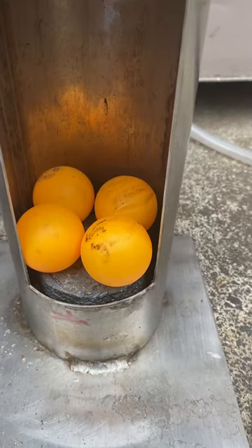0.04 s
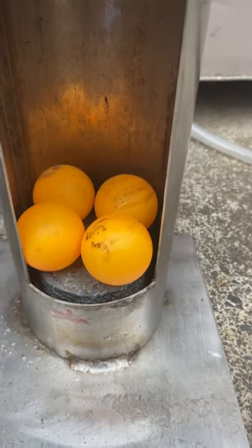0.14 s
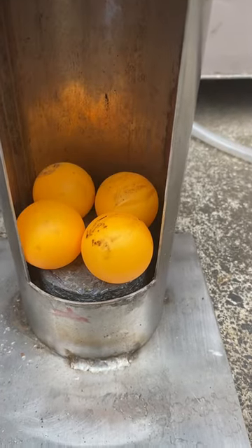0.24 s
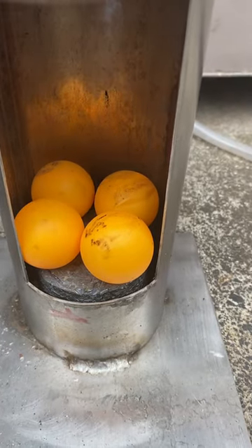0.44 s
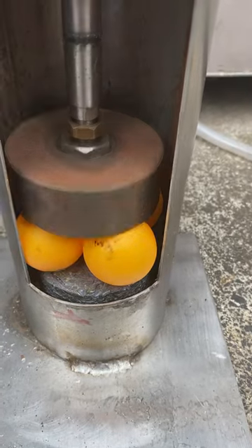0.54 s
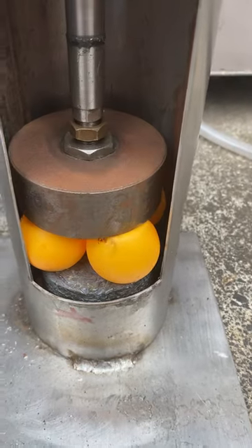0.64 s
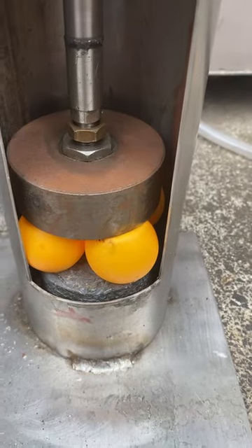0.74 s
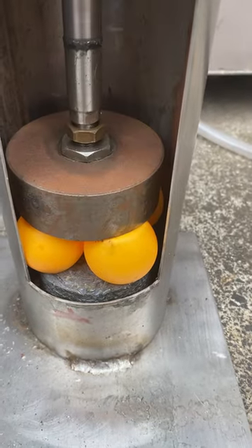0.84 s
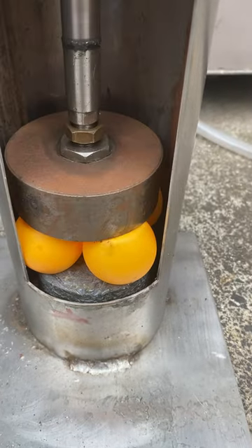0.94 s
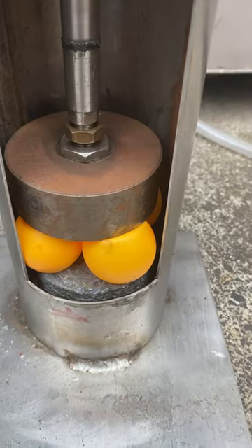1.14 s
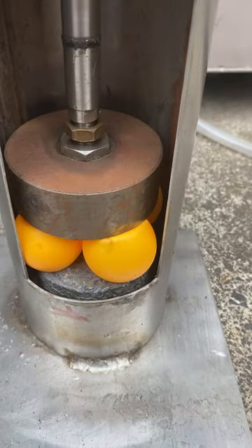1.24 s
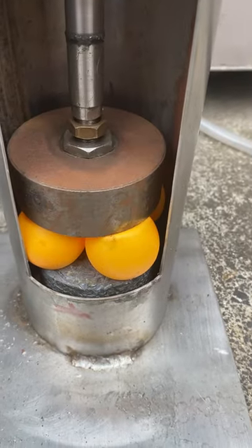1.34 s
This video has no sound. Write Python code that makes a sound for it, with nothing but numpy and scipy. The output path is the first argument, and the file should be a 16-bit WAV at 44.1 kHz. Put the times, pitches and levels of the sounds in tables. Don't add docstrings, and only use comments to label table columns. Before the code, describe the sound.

Close up outdoors, a pneumatic press clacks and blasts a short loud hiss of air, then its steel piston rattles onto hollow plastic balls with dull pocks and clinks, leaving faint traffic rumble.

```python
import sys
import numpy as np
from scipy import signal
from scipy.fft import rfft, irfft
from scipy.io import wavfile

SR = 44100
rng = np.random.default_rng(int(sys.argv[2]) if len(sys.argv) > 2 else 0)


def amp(db):
    return 10 ** (np.asarray(db, float) / 20)


def write(x):
    x = np.atleast_2d(x).T
    wavfile.write(sys.argv[1], SR, np.round(np.clip(x, -1, 1) * 32767).astype(np.int16))


N = 61739
T = np.arange(N) / SR
DUCK_S = .68


def read(table, hz):
    f, v = np.array(table, float).T
    return np.interp(np.log(np.maximum(hz, 1)), np.log(f), v)


def unit(x):
    return x / np.sqrt(np.mean(x ** 2))


def coloured(table):
    hz = np.arange(N // 2 + 1) * SR / N
    white = rng.standard_normal((2, N))
    return unit(irfft(rfft(white) * amp(read(table, hz)), N))


def band(x, hz, width):
    return signal.lfilter(*signal.iirpeak(hz, hz / width, fs=SR), x)


def walk(rate_hz):
    return unit(signal.lfilter(*signal.butter(2, rate_hz, fs=SR), rng.standard_normal(N)))


def ring(hits, modes):
    focus_db = 12.5
    rise_ms, level_scatter_db, phase_scatter_rad = 0.54, 1.5, .4
    out = np.zeros(N)
    luck = rng.standard_normal((len(hits), 2, 16))
    for (s, db, contact_ms, focus_hz), row in zip(hits, luck):
        t = np.maximum(T - s, 0)
        rise = np.minimum(t * 1000 / rise_ms, 1)
        for (hz, mode_db, t60), r, turn in zip(modes, *row):
            favour = amp(-focus_db * np.log2(hz / focus_hz) ** 2)
            soft = favour / (1 + (hz * contact_ms / 700) ** 2)
            decay = amp(db + mode_db + level_scatter_db * r - 60 * t / t60)
            out += decay * soft * np.sin(2 * np.pi * hz * t + phase_scatter_rad * turn) * rise
    return out


# frequency in Hz, level in dB per Hz.
TRAFFIC = [(25, -24.5), (45, -3.5), (75, 0.5), (105, -4), (170, -20), (500, -28.5), (1300, -39),
           (2300, -39.5), (5300, -44.5), (9000, -69)]


def yard():
    rumble_db, hiss_db, duck_db = -60, -73, 7
    hiss = amp(hiss_db + 0.5 * walk(21)) * band(rng.standard_normal((2, N)), 11000, 7200)
    far = coloured(TRAFFIC) * amp(rumble_db + 1.1 * walk(2.3)) + hiss
    return far * amp(duck_db / (1 + np.exp((T - DUCK_S) / 0.022)))


# start in seconds, level in dB, contact in ms, favoured Hz.
SETTLING = [
    (.0318, -61.5, .15, 2700),
    (.0325, -57.5, .2, 1500),
    (.9892, -53.5, .15, 1900),
    (.991, -62, 0.34, 813),
    (.9935, -57.5, .15, 2200),
    (1.3935, -70, .2, 1950),
]
# frequency in Hz, level in dB, t60 in seconds.
SHELL_MODES = [(646, -5.5, .04), (1290, -1, 0.049), (1620, 0.5, 0.022), (1900, 3, 0.035), (2120, 0, 0.04),
               (2700, -7.5, 0.038)]


def settling_taps():
    return ring(SETTLING, SHELL_MODES)


def burst(noise, s, db, hz, length, spread):
    t = T - s
    shape = (t > 0) * np.clip(t / 0.00057, 0, 1) * amp(db - 20 * np.abs(t) / length)
    return band(noise * shape, hz, spread * hz)


# start in seconds, level in dB, centre in Hz, length
# in seconds.
CREAK_EVENTS = [(.036, -45.5, 2738, 0.029), (.083, -64, 636, 0.0037), (.174, -53, 3300, 0.025),
                (.176, -53.5, 1500, .025), (.207, -42.5, 990.7, 0.084), (.2235, -35, 1870, 0.015),
                (.225, -43.5, 807, .02), (.226, -45, 4586, 0.033), (.236, -37.5, 3746, 0.018),
                (1.0, -55, 1699, 0.072), (.99, -56, 4300, .02), (.58, -29.5, 405.2, 0.16),
                (.6, -44, 227.6, 0.31), (1.13, -60.5, 4726, 0.083), (1.19, -59.5, 5200, 0.079),
                (1.17, -63.5, 3783, .15), (1.252, -60, 5255, .03)]


def creaks():
    noise, out = rng.standard_normal((2, N)), 0
    for s, db, hz, length in CREAK_EVENTS:
        rub = burst(noise, s, db, hz, length, .6)
        rub = band(rub, hz, .6 * hz)
        out = out + band(rub, hz, hz)
    return out


# start in seconds, level in dB, centre in Hz, length in seconds.
GRIT = [(.18, -58, 12000, 0.028), (0.212, -58.5, 8900, 0.0081), (0.856, -55.5, 6615, 0.02104),
        (1.051, -59, 8116, 0.018), (1.062, -55, 8500, .02), (1.127, -63.5, 9000, .03),
        (1.156, -53, 11000, 0.008), (1.213, -57, 9080, .015), (1.252, -60, 8500, 0.026),
        (1.283, -66, 10000, .015), (1.386, -62.5, 10930, .006), (1.395, -61, 5500, 0.0049)]


def ticks():
    noise = rng.standard_normal((2, N))
    return sum(burst(noise, s, db, hz, length, 1.1) for s, db, hz, length in GRIT)


# time in seconds, flow level in dB.
AIR_FLOW = [
    (0.224, -71.5),
    (0.243, -69.5),
    (0.243, -25.5),
    (0.245, -16.5),
    (0.255, -12.5),
    (0.285, -16.5),
    (.292, -18.5),
    (.52, -21),
    (0.539, -21),
    (0.56, -46),
]
# frequency in Hz, level in dB per Hz.
AIR_HISS = [(150, -26), (500, -20.5), (1600, -21.5), (2000, -4.5), (4300, -9.5), (6300, -0.5),
            (13500, -12.5), (16000, -6)]
# frequency in Hz, width in Hz, level in dB.
NOZZLE_MODES = [(546.3, 23, 3), (770.4, 90, 2.5), (1155, 69, 10.5), (1430, 120, 8), (2500, 150, -13.5),
                (3246, 140, 0.5), (5660, 160, -14.5), (10200, 1600, -2), (13000, 710, 11), (3910, 62, 2),
                (5260, 13, -4.5), (9660, 60, 1.5), (10200, 210, -2), (10860, 40, -0.5)]


def jet():
    hiss = coloured(AIR_HISS)
    tones = sum(amp(db) * band(hiss, hz, w) * amp(2 * walk(27)) for hz, w, db in NOZZLE_MODES)
    s, db = np.array(AIR_FLOW).T
    flow_db = np.interp(T, s, db, left=-120, right=-120)
    return unit(hiss + tones) * amp(flow_db + 1 * walk(146))


# start in seconds, level in dB, start pitch in Hz, end pitch in Hz, length in seconds.
JOLTS = [
    (0.2433, -23.5, 252.6, 45.1, 0.033),
    (0.266, -28, 193, 58.3, 0.023),
    (0.526, -31, 199, 78.13, 0.029),
    (0.557, -27, 242.2, 98.4, 0.02),
]


def thumps():
    out = np.zeros(N)
    for s, db, from_hz, to_hz, length in JOLTS:
        u = np.maximum(T - s, 0) / length
        hz = to_hz + (from_hz - to_hz) * np.exp(-u / 0.29)
        swell = amp(db) * np.sin(np.pi * np.minimum(u, 1))
        out -= swell * np.sin(2 * np.pi * np.cumsum(hz * (u > 0)) / SR)
    return out


# start in seconds, level in dB, contact in ms, favoured Hz.
VALVE_HITS = [
    (.2671, -12, 0.073, 3800),
    (.2669, -21, .1, 1600),
    (.2735, -26, .1, 1900),
    (.2785, -22, .08, 4000),
]
# frequency in Hz, level in dB, t60 in seconds.
VALVE_MODES = [(1045, -4.5, 0.045), (1872, 13, .025), (2810, -7.5, .015), (3560, 12, 0.0068),
               (4600, 4, 0.029)]


def valve_clacks():
    return ring(VALVE_HITS, VALVE_MODES)


# start in seconds, level in dB, contact in ms, favoured Hz.
BASE_KNOCKS = [
    (.2685, -28.5, 0.31, 455),
    (.2768, -20, 0.78, 420),
    (.5245, -25.5, 0.65, 450),
    (.5575, -22.5, 0.72, 328),
    (.565, -34.5, .6, 628),
    (.572, -21.5, 0.65, 460),
]
# frequency in Hz, level in dB, t60 in seconds.
PLATE_MODES = [(322, -4, 0.03), (460, -2, 0.04), (640, -8, 0.015), (390, -22, 0.09), (172, -19, 0.12)]


def plate_knocks():
    return ring(BASE_KNOCKS, PLATE_MODES)


# start in seconds, level in dB, contact in ms, favoured Hz.
PISTON_BLOWS = [(.5229, -6, 0.45, 1600), (.5268, -9, 0.46, 1600), (.5302, -12, 0.088, 2300),
                (.5325, -15.5, 0.26, 1500), (.5352, -5, 0.67, 1800), (.5408, -18, .3, 1700),
                (.5445, -21.5, 0.44, 1500), (.5488, -8, .4, 950), (.5496, -2.5, 0.4, 1750),
                (.5545, -10, .4, 1350), (.5585, -14.5, 0.68, 1900), (.5625, -16.5, 0.49, 1800),
                (.566, -14.5, 0.76, 1250), (.570, -23.5, .5, 1250), (.5745, -25.5, 0.75, 898.5),
                (.580, -28, .4, 2300)]
# frequency in Hz, level in dB, t60 in seconds.
BALL_MODES = [(802, -8, 0.03), (930, -5, 0.02), (1253, 0, 0.017), (1424, -5.5, 0.032), (1702, 6, 0.02),
              (1910, 1, 0.031), (2286, 1, 0.026), (2610, -15, 0.017)]


def ball_blows():
    return ring(PISTON_BLOWS, BALL_MODES)


# frequency in Hz, level in dB per Hz.
CHATTER = [(300, -37.5), (800, -19.5), (1500, -9.5), (3500, -4.5), (6000, 0.5), (10000, -3), (15000, -27)]


def rattle():
    start_s, length_s, level_db, scatter_db = .5235, .016, -15, 3.5
    t = T - start_s
    shape = (t > 0) * amp(-6 * t / length_s - 2500 * np.maximum(t - length_s, 0))
    return coloured(CHATTER) * shape * amp(level_db + scatter_db * walk(490))


# start in seconds, level in dB, contact in ms, favoured Hz.
PISTON_CLINKS = [
    (.5236, -11, .08, 3150),
    (.5242, -7.5, .08, 5300),
    (.5308, -12.5, .08, 4800),
    (.5348, -16, .08, 5700),
    (.5362, -18, .08, 3650),
    (.552, -16, .08, 3750),
]
# frequency in Hz, level in dB, t60 in seconds.
STEEL_MODES = [(3270, 1, .018), (3560, -6, .025), (4240, -8, .022), (5180, 0, .02), (5940, -5, .03)]


def steel_clinks():
    return ring(PISTON_CLINKS, STEEL_MODES)


# frequency in Hz, level in dB, t60 in seconds.
TUBE_MODES = [(1733, -45, .8), (2290, -44, .15), (2570, -56, .6), (3760, -50, .16), (4290, -48, .25)]


def tube():
    start_s, rise_s, beat_hz = .55, .03, 1.5
    t = np.maximum(T - start_s, 0)
    swell = np.minimum(t / rise_s, 1) * np.cos(np.pi * np.minimum(beat_hz * t, .5))
    return swell * sum(amp(db - 60 * t / t60) * np.sin(2 * np.pi * hz * t) for hz, db, t60 in TUBE_MODES)


# start in seconds, length in seconds, pitch in Hz, level in dB.
WHISTLES = [
    (1.185, .1, 2400, -72),
    (1.275, .09, 2250, -82),
    (1.06, .1, 2040, -82),
]
# start in seconds, length in seconds, pitch in Hz, level in dB.
LOW_NOTE = (1.345, .045, 490, -68)


def bird():
    sag_hz_per_s = 800
    out, waver_rad = np.zeros(N), .8 * walk(50)
    for s, length, hz, db in WHISTLES:
        t = np.clip(T - s, 0, length)
        cycles = (hz - sag_hz_per_s * t / 2) * t
        out += amp(db) * np.sin(np.pi * t / length) * np.sin(2 * np.pi * cycles + waver_rad)
    s, length, hz, db = LOW_NOTE
    t = np.clip(T - s, 0, length)
    note = amp(db) * np.sin(np.pi * t / length) * np.sin(2 * np.pi * hz * t + waver_rad)
    return out * amp(2 + 2.5 * walk(60)) + note


def room(x):
    t = T[:SR // 2]
    noise = rng.standard_normal((2, len(t))) * (t > .002) / np.sqrt(SR * 0.006)
    dull = signal.lfilter(*signal.butter(1, 4000, fs=SR), noise)
    early = noise * amp(-8.5 - 60 * t / 0.18)
    late = dull * amp(-40.5 - 60 * t / 0.69)
    return signal.fftconvolve(x[None], early + late, axes=1)[:, :N]


def ports(pair, lead, alike, balance):
    hz = np.arange(N // 2 + 1) * SR / N
    c = 1 - (1 - np.clip(alike, 0, 1)) * np.minimum(hz / 600, 1)
    mid = rfft(pair[0]) * np.sqrt((1 + c) / 2)
    side = rfft(pair[1]) * np.sqrt((1 - c) / 2)
    f, rad = np.array(lead, float).T
    turn = np.exp(.5j * np.interp(hz, f, rad)) * amp(read(balance, hz) / 2)
    return np.array([irfft((mid + side) * turn, N), irfft((mid - side) / turn, N)])


# frequency in Hz, left port's lead in radians.
AIR_PHASE = [(30, 0), (1500, 3.1), (3500, 6.6), (4500, 7.2), (7500, 9.4), (10400, 12.6), (13700, 15.7),
             (16000, 18.9)]
HIT_PHASE = [(30, 0), (1900, -.5), (3400, 0), (4500, .9), (7500, 3.1), (10400, 6.3), (13700, 9.4),
             (16000, 12.6)]
# frequency in Hz, left minus right in dB.
AIR_BALANCE = [(60, -1), (200, -0.5), (400, 8), (700, 9), (1400, 6.5), (2400, -0.5), (4000, 9),
               (7000, -1.5)]
HIT_BALANCE = [(60, -2.5), (200, 9), (400, 4), (700, 13.5), (1300, 3), (2400, -10.5), (4400, -7.5),
               (8000, 0)]
YARD_BALANCE = [(60, 2.5), (200, 1), (700, 3), (1300, 1), (2400, -2.5), (4400, 0.5)]


def scene():
    around = yard() + creaks() + ticks() + bird()
    air, chatter = jet(), rattle()
    hits = valve_clacks() + plate_knocks() + ball_blows() + steel_clinks()
    rung = hits + tube() + settling_taps()
    rushing = air + chatter + room(air[0] + chatter[0])
    struck = np.array([rung + thumps(), rung * 0.09]) + amp(-11.5) * room(hits)
    close = ports(rushing, AIR_PHASE, .75, AIR_BALANCE) + ports(struck, HIT_PHASE, 0.64, HIT_BALANCE)
    return close + ports(around, HIT_PHASE, .35, YARD_BALANCE)


# start in seconds, end
# in seconds.
SPARED = [(.24, .25), (1.15, 1.165), (1.2, 1.275)]


def gaps(x, bands):
    wander_hz, quiet_shift_hz = 110, -400
    hz, s, z = signal.stft(x, SR, nperseg=1024)
    hz = hz[:, None]
    luck = rng.standard_normal((len(s), len(bands), 2))
    luck = np.repeat(luck, 4, axis=0)[:len(s)]
    spared = sum((s > a) & (s < b) for a, b in SPARED) > 0
    for k, (lo, hi) in enumerate(bands):
        edge = wander_hz * luck[:, k].T + quiet_shift_hz * (s > DUCK_S) * (k == 0)
        inside = (hz > lo + edge[0]) & (hz < hi + edge[1])
        z = z * ~(inside & ~(spared & (hz < 16600)))
    return signal.istft(z, SR, nperseg=1024)[1][:N]


# low edge in Hz, high edge in Hz.
MID_HOLES = [(6600, 8650), (12550, 15150), (15750, 22050)]
SIDE_HOLES = [(9600, 11600), (14500, 15250), (15400, 22050)]


def thinned(x):
    mid = gaps((x[0] + x[1]) / 2, MID_HOLES)
    side = gaps((x[0] - x[1]) / 2, SIDE_HOLES)
    return np.array([mid + side, mid - side])


def low_pass(x):
    return signal.sosfilt(signal.butter(12, 17070, fs=SR, output="sos"), x)


def record(dry):
    cut = signal.lfilter(*signal.butter(4, 32, "high", fs=SR), dry)
    return low_pass(thinned(np.tanh(cut)))


dry = scene()
out = record(dry)
write(out)
```